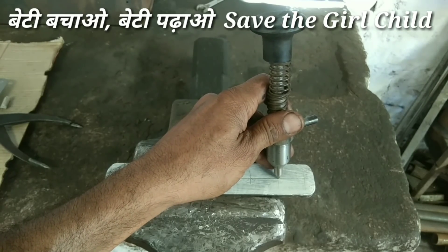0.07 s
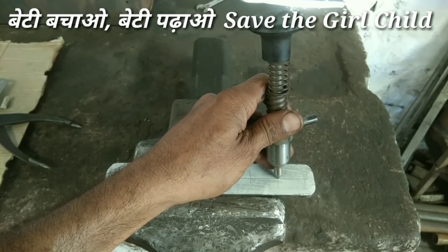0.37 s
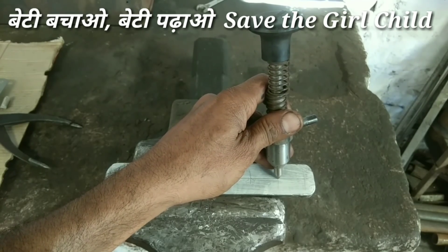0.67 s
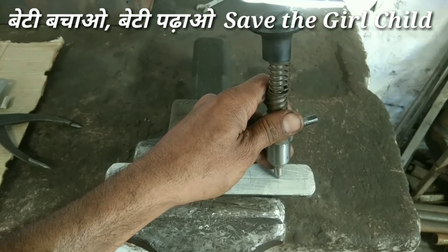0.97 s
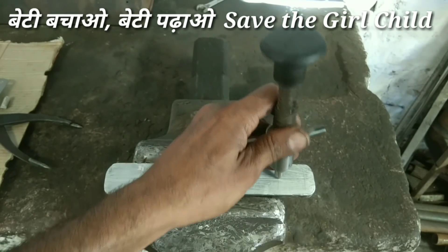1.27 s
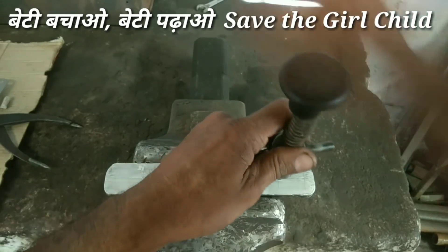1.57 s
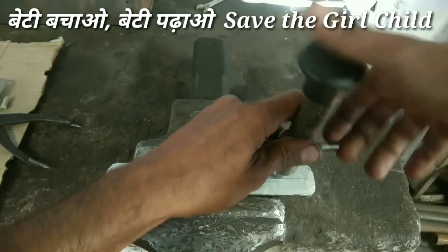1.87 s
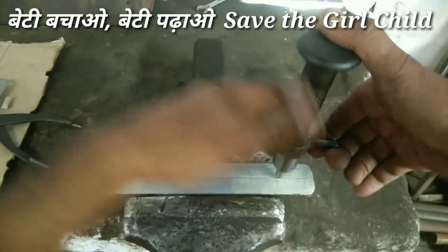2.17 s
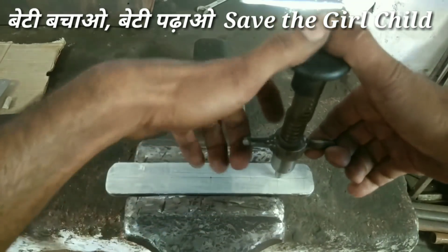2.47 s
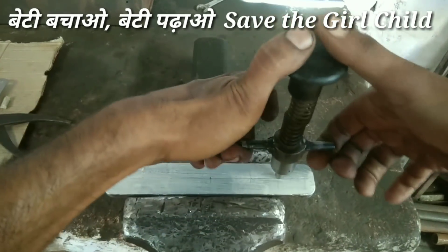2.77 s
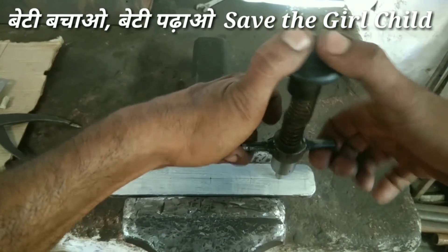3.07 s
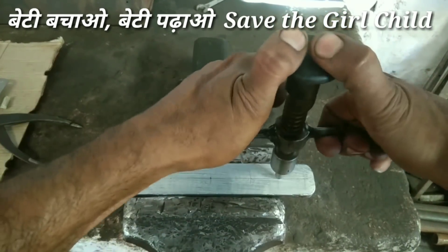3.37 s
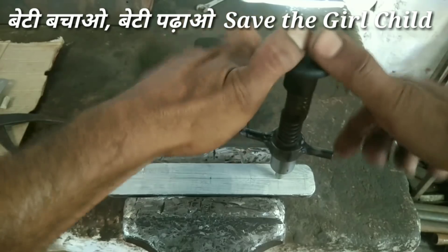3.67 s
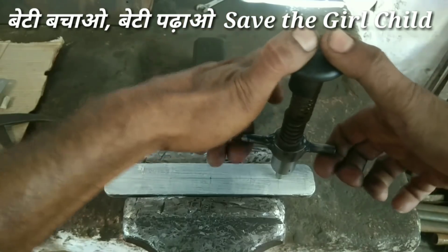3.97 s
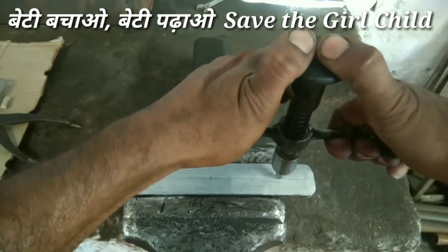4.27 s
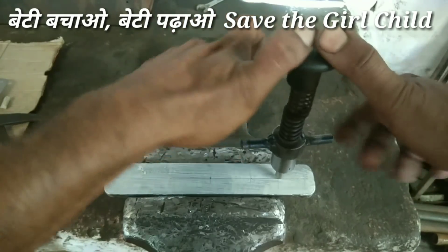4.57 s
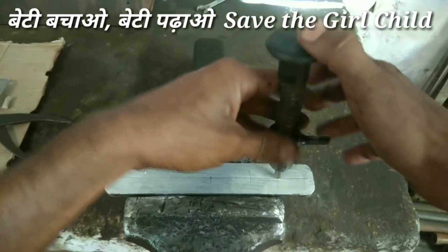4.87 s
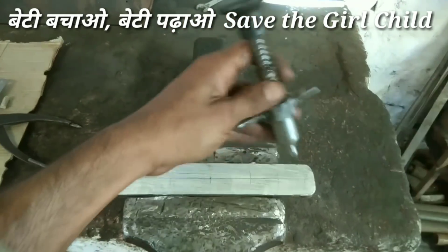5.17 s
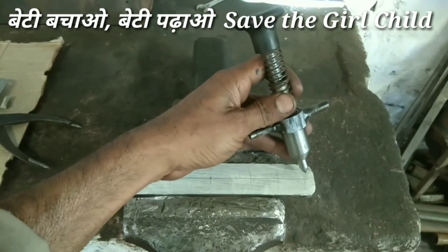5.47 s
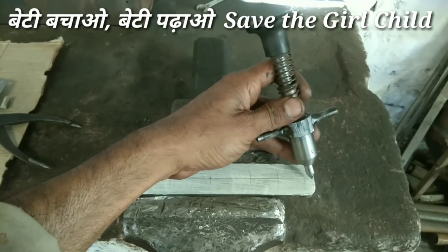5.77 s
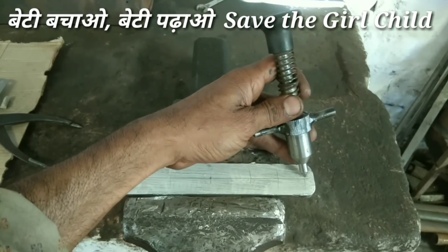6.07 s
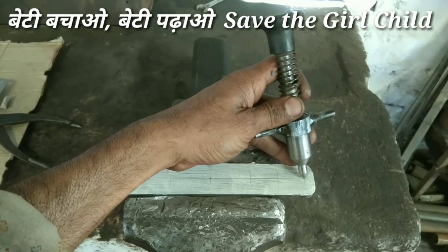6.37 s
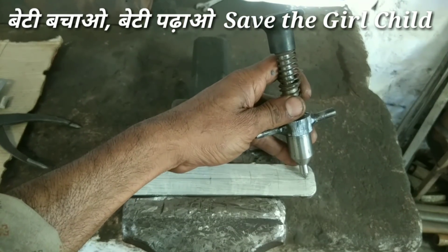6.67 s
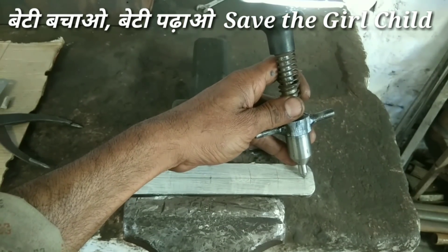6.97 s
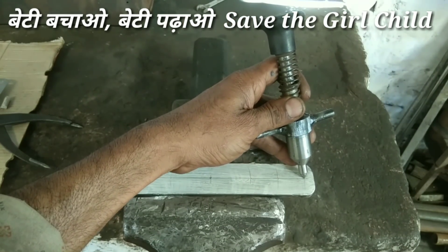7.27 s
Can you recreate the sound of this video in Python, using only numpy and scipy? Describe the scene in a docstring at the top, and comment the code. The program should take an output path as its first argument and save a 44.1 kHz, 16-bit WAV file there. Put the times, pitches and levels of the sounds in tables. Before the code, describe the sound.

Two sharp, ringing metal snaps from a hand punch, with dull scuffs and bumps over low room rumble, ending in a plastic-like clack.

```python
"""A small workshop, with a muffled rumble, a faint low band of noise and a thin whistle far off.
Close to a hand-held camera, a spring-loaded centre punch is set on a metal bar on the bench and snaps
twice: the catch trips, the hammer lands and bounces, the steel rings. Its parts slide, tick and squeak,
and its coil spring sings around the first snap. The hands add dull scuffs and bumps, and taps on the
camera's case knock and clack."""
import sys
import numpy as np
from scipy import signal
from scipy.fft import rfft, irfft, next_fast_len
from scipy.io import wavfile
from scipy.ndimage import uniform_filter1d, map_coordinates

SR = 44100
rng = np.random.default_rng(int(sys.argv[2]) if len(sys.argv) > 2 else 0)


def unload_audio(sound):
    """Save the sound as a 16-bit wav file, at the path given as the first command line argument."""
    columns = np.transpose(np.atleast_2d(sound))
    # keep every value between -1 and 1, then stretch to whole-number steps
    steps = np.round(np.clip(columns, -1, 1) * 32767)
    wavfile.write(sys.argv[1], SR, steps.astype(np.int16))


N = 332073
TIME = np.arange(N) / SR
AGE = np.arange(SR // 2) / SR  # time since a blow [s]

# stereo width of the room tone and the scuffs: (frequency [Hz], side level [dB])
SHOP_WIDTH = [(60, -59), (110, -56.5), (200, -51.5), (380, -41.5), (700, -35), (1290, -45), (2380, -33),
              (4400, -14.5), (8120, -19), (15000, -5.5)]
# stereo width of the punch and the bench: (frequency [Hz], side level [dB])
STEEL_WIDTH = [(100, -6.5), (700, -5), (2400, 0.5), (8000, 0), (15000, -1.5)]


def amp(db):
    """Decibels to gain."""
    return 10 ** (np.asarray(db) / 20)


def unit(x):
    """Scale to rms 1."""
    return x / np.sqrt(np.mean(x ** 2) + 1e-20)


def along(points, hz):
    """Read (frequency, value) points on a log axis."""
    knots, values = np.transpose(points)
    return np.interp(np.log(hz + 1), np.log(knots + 1), values)


def curves(rows):
    """One automation curve for each column after the time."""
    times, *columns = np.transpose(rows)
    return [np.interp(TIME, times, column) for column in columns]


def wobble(rate, size=N):
    """A smooth random curve, rate knots a second."""
    knots = rng.standard_normal(int(size * rate / SR) + 4)
    return map_coordinates(knots, [np.arange(size) * rate / SR])


def envelope(start, attack, hold, release):
    """A straight rise, a hold, then a fall of 60 dB in the release time."""
    age = TIME - start
    return np.clip(age / attack, 0, 1) * amp(-60 * np.clip((age - attack - hold) / release, 0, 3))


def filtered(x, response):
    """Equalise x with a gain that is a function of frequency."""
    size = x.shape[-1]
    padded = next_fast_len(size + 8192)
    return irfft(rfft(x, padded) * response(np.fft.rfftfreq(padded, 1 / SR)), padded)[..., :size]


def noise(colour, width=None, size=N):
    """Two-channel noise of rms 1, mono without a width; both curves are (frequency [Hz], level [dB])."""
    mid, side = filtered(rng.standard_normal((2, size)), lambda hz: amp(along(colour, hz)))
    side = 0 if width is None else filtered(side, lambda hz: amp(along(width, hz)))
    return unit(np.array([mid + side, mid - side]))


def patchy_noise(colour):
    """Noise of rms 1, broken into patches of random gain over time and frequency."""
    spectra = signal.stft(noise(colour, SHOP_WIDTH), nperseg=512)[2]
    patches = uniform_filter1d(rng.standard_normal(spectra.shape[1:]), size=4, axis=0)
    patches = unit(uniform_filter1d(patches, size=5, axis=1))
    return unit(signal.istft(spectra * amp(3 * patches), nperseg=512)[1][:, :N])


def burst(sound, shape):
    """A sound under an envelope, carrying exactly the envelope's energy."""
    return unit(sound * shape) * np.sqrt(np.mean(shape ** 2))


def add(track, start, sound):
    """Mix a sound into the track at start [s]."""
    part = track[:, round(start * SR):][:, :sound.shape[-1]]
    part += sound[..., :part.shape[-1]]


def workshop():
    """Room tone: a muffled, restless rumble under a thin hiss."""
    # slow drift of the rumble: (time [s], level [dB])
    drift = [(0, -62), (1.4, -63.5), (2.3, -61.5), (4.6, -62), (5.3, -64), (6.1, -61.5), (6.7, -64.5),
             (7.53, -61)]
    # spectra of the rumble and the hiss: (frequency [Hz], level [dB])
    rumble_colour = [(25, -17.5), (45, 2.5), (70, 10.5), (130, 5.5), (230, -0.5), (330, 4.5), (480, -4.5),
                     (750, -1), (1000, -4.5), (1320, -1.5), (2000, -8.5), (2450, -16), (2900, -28.5),
                     (4500, -44.5)]
    hiss_colour = [(2000, 3), (3000, 4), (4200, -2.5), (6300, -5), (7150, -0.5), (7600, -2.5), (8900, -4.5),
                   (9300, -0.5), (9700, -1.5), (10400, -2), (13000, -6), (15500, -7.5)]
    level_db, = curves(drift)
    sway_db = 0.9 * (wobble(11) + wobble(40))
    rumble = amp(level_db + sway_db) * patchy_noise(rumble_colour)
    return rumble + amp(-84) * noise(hiss_colour, SHOP_WIDTH)


def low_band():
    """A faint band of noise near 360 Hz, wide in stereo, that swells twice."""
    # swells of the band: (start [s], level [dB], attack [s], hold [s])
    swells = [(2.1, -77.5, 1.2, 1.1), (5.35, -76.5, .15, 0.49)]
    swell = sum(amp(db) * envelope(start, attack, hold, release=1.5)
                for start, db, attack, hold in swells)
    colour = [(200, -35), (320, -14.5), (361, 2), (410, -11), (600, -25.5), (1000, -30), (2000, -50.5)]
    return (amp(-92) + swell) * noise(colour, width=[(361, -3)])


def whistle():
    """A thin, wavering whistle far off that comes and goes, reaching each microphone differently."""
    # spells of whistling: (start [s], level [dB], hold [s], pitch [Hz])
    spells = [(0, -90.5, 2.2, 3510), (4.901, -94, 0.05, 3560), (5.5, -92.5, 1.7, 3300)]
    out = np.zeros((2, N))
    for start, db, hold, hz in spells:
        phase = 2 * np.pi * np.cumsum(hz + 45 * wobble(9.8)) / SR
        blurred = np.array([wobble(170) * np.sin(phase) + wobble(170) * np.cos(phase) for _ in range(2)])
        out += amp(db + 2.2 * wobble(8.8)) * envelope(start, attack=0.5, hold=hold, release=3) * blurred
    return out


def room(x):
    """The walls' answer, uneven over frequency and different at each microphone; the highs die first."""
    # reverb decay: (frequency [Hz], t60 [s])
    walls = [(100, .15), (1000, 0.29), (4000, 0.43), (9000, 0.24), (15000, 0.11)]
    hz, age, spectra = signal.stft(rng.standard_normal((2, SR // 2)), SR, nperseg=256)
    ridges = amp(7 * np.tanh(wobble(SR / 2, size=len(hz))))[:, None]
    decay = amp(-60 * age / along(walls, hz)[:, None])
    tail = signal.istft(spectra * ridges * decay, SR, nperseg=256)[1]
    tail *= 1 - np.exp(-np.arange(tail.shape[1]) / SR / 0.03)  # the reflections build up
    return signal.fftconvolve(x, tail / np.linalg.norm(tail[0]), axes=1)[:, :N]


def scuffs():
    """Hands shift their grip in short, dull scuffs."""
    # shifts of grip: (start [s], level [dB], hold [s])
    shifts = [(0.46, -59, 0.04), (1.083, -60.5, 0.055), (1.733, -61, 0.042), (1.94, -63, 0.23),
              (2.22, -59.5, 0.052), (2.409, -62.5, 0.019), (4.02, -60, 0.064), (4.239, -61, 0.034),
              (4.475, -62, 0.032), (4.701, -63, 0.25), (5.108, -65, .03), (5.499, -64.5, 0.028),
              (5.733, -63, 0.035), (5.95, -60.5, 0.052), (6.309, -60.5, 0.034), (6.898, -66, 0.077),
              (7.259, -62, 0.059)]
    # spectrum of a scuff: (frequency [Hz], level [dB])
    colour = [(40, -3), (125, 3.5), (230, 0), (330, 7), (480, -3.5), (750, -1), (1320, -2), (2000, -9),
              (2450, -16), (2900, -28), (4500, -44.5)]
    level = sum(amp(db) * envelope(start, attack=0.024, hold=hold, release=0.19)
                for start, db, hold in shifts)
    return level * patchy_noise(colour)


def bumps():
    """Soft handling bumps: one or two low swings of the camera's body with a dull rustle."""
    # nudges: (time [s], relative level [dB], pitch [Hz], swing length [s], swings [count])
    nudges = [(0.21, -44, 60.5, 0.027, 1), (0.475, -40, 64, .028, 1), (0.979, -40.5, 79, 0.033, 1),
              (1.723, -42.5, 66.5, .056, 2), (1.956, -33, 64.6, 0.065, 1), (2.035, -36, 97, 0.054, 1),
              (2.098, -41, 63, 0.064, 2), (2.229, -41.5, 90.4, 0.041, 2), (2.702, -45, 99, 0.036, 2),
              (3.221, -45.5, 86.5, 0.028, 1), (3.337, -46.5, 48, 0.032, 1), (3.383, -39, 67, 0.038, 1),
              (3.634, -42.5, 89.5, 0.053, 1), (3.846, -50, 56, 0.045, 1), (4.228, -46, 61, 0.049, 2),
              (4.402, -48.5, 72, 0.05, 1), (4.762, -23.5, 72, .042, 2), (4.828, -36.5, 85, .04, 2),
              (4.893, -34, 58, .039, 1), (5.121, -47.5, 101, 0.044, 1), (5.754, -50, 100, 0.0375, 1),
              (5.992, -49, 99, 0.043, 1), (6.083, -49, 100, 0.037, 1), (6.4, -42, 68, 0.0338, 2),
              (6.985, -51, 93, 0.043, 1), (7.362, -45.5, 96, 0.035, 2)]
    # spectrum of the rustle: (frequency [Hz], level [dB])
    rustle_colour = [(30, -12.5), (55, -2.5), (130, 5.5), (190, -5), (260, -20.5), (400, -29.5),
                     (1200, -40.5), (2500, -68)]
    step, loss_db = 0.68, 2.5  # a second swing starts this far through the first, this much weaker
    out = np.zeros((2, N))
    for start, db, hz, length, count in nudges:
        swell = np.sin(np.pi * np.minimum(AGE / length, 1)) ** 2
        for k in range(round(count)):
            swing = np.sin(2 * np.pi * hz * (AGE - length / 2) + 0.33 * wobble(130, size=len(AGE)))
            rustle = amp(-13) * noise(rustle_colour, size=len(AGE))
            add(out, start + k * step * length, amp(db - 0.5 - k * loss_db) * swell * (swing + rustle))
    return out


def taps():
    """Dull knocks that reach both microphones through the case; hard ones make it clack."""
    # taps on the case: (time [s], knock level [dB], t60 [s], clack level [dB])
    hits = [(1.739, -58, 0.065, -90), (1.912, -56.5, 0.04, -90), (2.425, -58.5, 0.14, -90),
            (3.035, -53.5, 0.12, -85), (6.355, -45.5, 0.22, -69), (6.394, -49.5, 0.085, -90),
            (6.530, -55, 0.039, -90.5), (6.734, -54.5, 0.033, -89.5), (6.775, -53.5, 0.049, -88.5),
            (7.3517, -49, 0.024, -32), (7.355, -40, 0.021, -36), (7.364, -52, 0.25, -47),
            (7.395, -55, 0.081, -52.5)]
    # spectra of the low knock and the case's clack: (frequency [Hz], level [dB])
    knock_colour = [(70, -27.5), (120, -7), (190, -11), (290, 17.5), (420, 8), (520, 5.5), (720, 9),
                    (1330, 5), (2040, -3.5), (2460, -34), (4000, -56)]
    clack_colour = [(600, -16), (1700, -28), (1990, 5), (2120, 2), (2250, 6.5), (2360, 1.5), (2600, -7),
                    (2950, -22), (3700, -34), (4900, -31), (5350, -17.5), (5950, -23.5), (6400, -25),
                    (7200, -29), (8300, -36), (9250, -26), (10000, -47), (15000, -48)]
    out = np.zeros((2, N))
    for start, knock_db, t60, clack_db in hits:
        fade = (1 - np.exp(-AGE / 0.00082)) * amp(-60 * AGE / t60)
        knock = amp(knock_db) * burst(noise(knock_colour, size=len(AGE)), fade)
        clack = amp(clack_db) * burst(noise(clack_colour, size=len(AGE)), fade)
        add(out, start, knock + clack)
    return out


def bench():
    """Each snap leaves a faint hollow ring in the bench."""
    # shakes of the bench: (time [s], relative level [dB])
    shakes = [(3.675, -66), (4.53, -60)]
    # its hollow resonance: (frequency [Hz], level [dB])
    colour = [(150, -21.5), (330, -4), (500, -3.5), (680, 8), (820, -4.5), (1100, -15.5), (2200, -31.5)]
    swell = (1 - np.exp(-AGE / 0.017)) * amp(-60 * AGE / 0.9) * (1 - AGE / AGE[-1])
    out = np.zeros((2, N))
    for start, db in shakes:
        add(out, start, amp(db + 4) * swell * noise(colour, STEEL_WIDTH, size=len(AGE)))
    return out


def sleeve():
    """Fine, gritty friction as the sleeve slides on the shaft."""
    # strokes of the sleeve: (start [s], level [dB], attack [s], hold [s], release [s])
    strokes = [(1.51, -77, 0.086, 0.12, .3), (1.718, -69, 0.051, .015, 0.11),
               (1.928, -76.5, 0.019, .01, 0.8), (2.676, -75.5, .02, .005, 0.31),
               (2.86, -73, 0.112, .01, 0.61), (4.233, -69.5, 0.031, 0.019, 0.28)]
    # spectrum of the friction: (frequency [Hz], level [dB])
    colour = [(2000, -15), (4000, -7.5), (7000, -8), (10000, -4.5), (12500, -4), (15500, -7.5)]
    speed = sum(amp(db) * envelope(start, attack, hold, release)
                for start, db, attack, hold, release in strokes)
    grit = unit(amp(2.5 * wobble(400)))
    return speed * grit * noise(colour, STEEL_WIDTH)


def squeak():
    """One faint, raspy falling squeak."""
    # the squeak's glide: (time [s], pitch [Hz], relative level [dB])
    glide = [(6.21, 4450, -100), (6.24, 4410, -77), (6.28, 4260, -76.5), (6.30, 4050, -73.5),
             (6.32, 4050, -85), (6.35, 4030, -105)]
    hz, db = curves(glide)
    tone = np.sin(2 * np.pi * np.cumsum(hz * (1 + 0.025 * wobble(900))) / SR)
    rasp = noise([(3400, -34), (4200, -3), (5200, -14), (6500, -21), (12000, -35.5)], STEEL_WIDTH)
    gate = db > -99
    return (tone + amp(-2.5) * rasp) * amp(db - 2.5 + 2 * wobble(90)) * gate


def spring():
    """The coil rubs on the shaft and sings in a cluster of close modes."""
    # the coil's ringing, a longer spell and then a short, softer one: (start [s], level [dB], hold [s])
    spells = [(3.346, -59.5, 0.22), (3.726, -64.5, .06)]
    # resonances of the coil: (frequency [Hz], level [dB])
    coil = [(2500, -20), (2850, -16.5), (2950, -10.5), (3040, -14.5), (3130, 6), (3190, -4), (3240, -9),
            (3400, -14.5), (3510, 0.5), (3620, -19), (3780, -11.5), (3880, -26.5), (4010, -13), (4150, -28),
            (4320, -25), (4700, -28.5), (5600, -38.5), (7000, -32.5), (11500, -32), (15000, -39.5)]
    rub = sum(amp(db) * envelope(start, attack=0.033, hold=hold, release=0.6)
              for start, db, hold in spells)
    song = filtered(noise(coil, STEEL_WIDTH), lambda hz: hz ** 2 / (hz ** 2 + 900 ** 2))  # low cut
    return rub * amp(1.6 * wobble(45)) * song


def body_ring(crack):
    """A crack rings the punch's damped modes, at new strengths for every blow."""
    # modes of the steel: (frequency [Hz], level [dB], t60 [s])
    modes = [(2400, -3.5, .2), (3020, -8.5, .17), (3860, -5.5, 0.22), (4160, -9, .1), (4550, -5.5, .13),
             (5300, -6, 0.19), (5900, -2.5, .2), (6460, -6, .16), (7130, -7, .16), (7460, -2.5, .16),
             (7570, -2.5, .12), (8200, -9, .12), (9050, -1, .18), (9100, -2, .17), (9530, 2, .16),
             (9750, 1.5, .16), (10500, -7, .12), (10600, -3.5, .16), (11900, -2.5, .15), (12470, -4, .15),
             (12950, -3.5, .15), (14225, -9, .1), (15400, -6.5, .085)]
    ring = sum(amp(db + 3 * rng.standard_normal() - 60 * AGE / t60) * np.sin(2 * np.pi * hz * AGE)
               for hz, db, t60 in modes)
    body = signal.fftconvolve(crack, ring[None], axes=1)[:, :len(AGE)]
    rattle = amp(2 * wobble(150, size=len(AGE)))  # loose parts rattle as they ring
    return unit(body * rattle) * np.std(crack)


def main_mode(hz):
    """The punch's main mode: it depends on how the tip is seated, and every impact jolts its phase."""
    # the mode is split in three: (frequency [ratio], level [dB])
    split = [(.966, -6.5), (1, -3), (1.03, -6.5)]
    jolt_rad, stereo_rad = 0.9, np.array([[0], [1.2]])
    cluster = np.zeros((2, len(AGE)))
    for ratio, db in split:
        jolts = jolt_rad * np.array([wobble(500, size=len(AGE)) for _ in range(2)])
        cluster += amp(db) * np.sin(2 * np.pi * ratio * hz * AGE + jolts + stereo_rad)
    return np.sqrt(2) * cluster


def contact(db, length, tilt_db, mode_db, mode_hz, body_db, pan_db):
    """Steel chatters on steel for length [s]: a crackling burst that rings the punch."""
    # spectrum of the crack before its tilt per octave: (frequency [Hz], level [dB])
    crack_colour = [(180, -49), (300, -9.5), (990, -12), (1680, -17), (2350, -13.5), (3380, -12),
                    (3990, -10), (5740, -13.5), (8550, -6.5), (9610, -12), (10400, -4.5), (13400, -10),
                    (15800, -17.5)]
    after = np.maximum(AGE - length, 0)
    force = (1 - np.exp(-AGE / 0.00039)) * amp(-60 * after / 0.023)
    grain = amp(3.7 * np.tanh(wobble(1800, size=len(AGE))))  # separate tiny impacts
    # each contact's own tilt makes its crack brighter or duller
    colour = [(hz, level + tilt_db * np.log2(hz / 1000)) for hz, level in crack_colour]
    crack = burst(grain * noise(colour, STEEL_WIDTH, size=len(AGE)), force)
    body = amp(body_db) * body_ring(crack)
    mode_fade = (1 - np.exp(-AGE / 0.0012)) * amp(-60 * after / 0.031)
    mode = amp(mode_db) * main_mode(mode_hz) * mode_fade
    pan = amp(np.array([[pan_db], [-pan_db]]) / 2)
    return amp(db) * pan * (crack + body + mode)


def punch():
    """In a snap the catch trips, the hammer lands and bounces ever weaker; loose parts tick lightly."""
    # snaps: (trip time [s], trip level [dB], blow time [s], blow level [dB], blow chatter [s],
    # main mode [Hz], body ring [dB], bounce gap [s], loss per bounce [dB], left over right [dB])
    snaps = [(3.663, -36.5, 3.6726, -36, .0082, 9430, -15, .0094, 20, -2),
             (4.5122, -40, 4.517, -39, .016, 9770, -6.5, .02, 4.5, -0.5)]
    # ticks of the loose parts: (time [s], level [dB], chatter [s], tilt [dB/octave],
    # main mode level [dB], main mode [Hz], left over right [dB])
    ticks = [(1.495, -71, .002, 0, -13, 9200, -5), (1.632, -68.5, .002, 8, -17, 9300, -9),
             (1.738, -60.5, 0.0036, -2.5, -13, 9700, 0), (3.2392, -61, .001, -2, 3.5, 2450, -5),
             (4.242, -62, 0.012, -4, -4.5, 2415, -4), (4.287, -67.5, .003, 0, -4, 2454, -8),
             (7.32, -64.5, .004, 8, -13, 9300, 0), (7.34, -71, .001, 4, -5, 5440, 3)]
    out = np.zeros((2, N))
    for trip_s, trip_db, blow_s, blow_db, length, mode_hz, body_db, gap, loss_db, pan_db in snaps:
        voice = dict(mode_hz=mode_hz, body_db=body_db, pan_db=pan_db)
        add(out, trip_s, contact(trip_db, length=0.004, tilt_db=0.5, mode_db=-18, **voice))
        add(out, blow_s, contact(blow_db, length, tilt_db=0.8, mode_db=2.5, **voice))
        for k in range(4):
            bounce = contact(blow_db - 10 - k * loss_db, length=0.0041, tilt_db=-0.5, mode_db=-4, **voice)
            add(out, blow_s + (k + 1) * gap, bounce)
    for start, db, length, tilt_db, mode_db, mode_hz, pan_db in ticks:
        add(out, start, contact(db, length, tilt_db, mode_db, mode_hz, body_db=-5.5, pan_db=pan_db))
    return out


def scene():
    """Punch, handling and workshop together; only the snaps, ticks and squeak feed the reverb."""
    steel = punch() + squeak()
    tool = steel + amp(-15) * room(steel) + bench() + spring() + sleeve()
    return tool + taps() + bumps() + scuffs() + workshop() + low_band() + whistle()


def record(dry):
    """The camera cuts the deepest bass and everything above its band limit."""
    low_hz, top_hz = 32, 15600
    return filtered(dry, lambda hz: (hz < top_hz) * hz ** 3 / np.sqrt(hz ** 6 + low_hz ** 6))


dry = scene()
out = record(dry)
unload_audio(out)
```